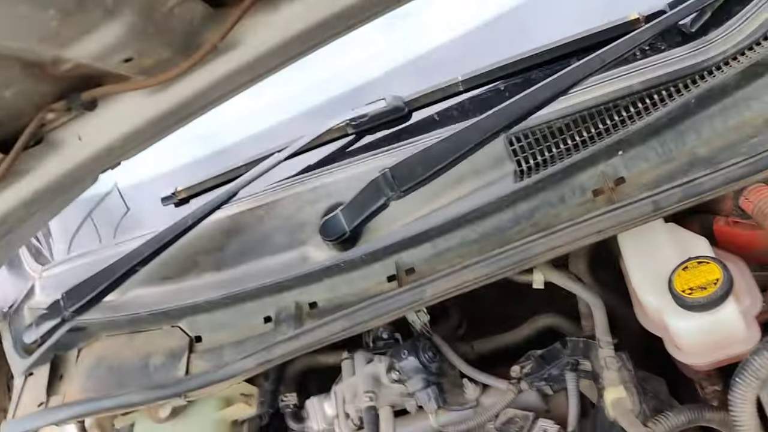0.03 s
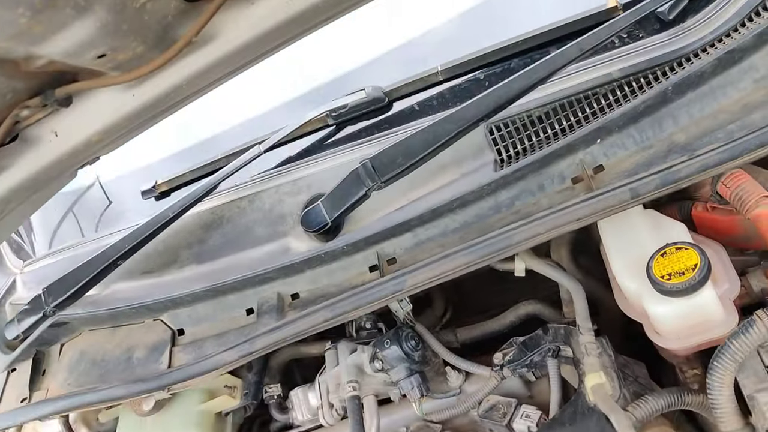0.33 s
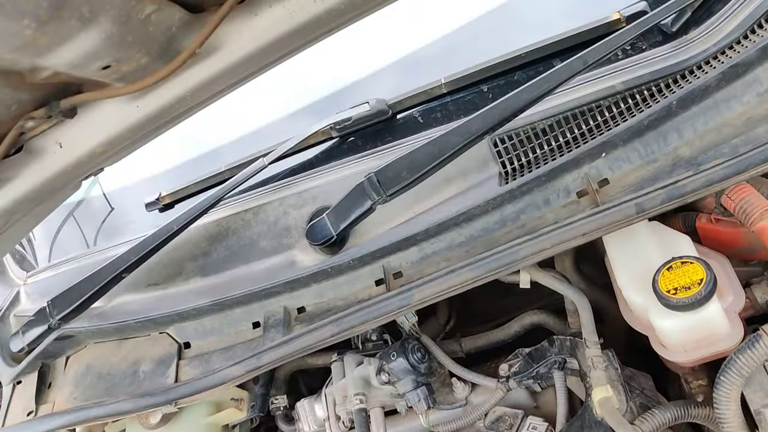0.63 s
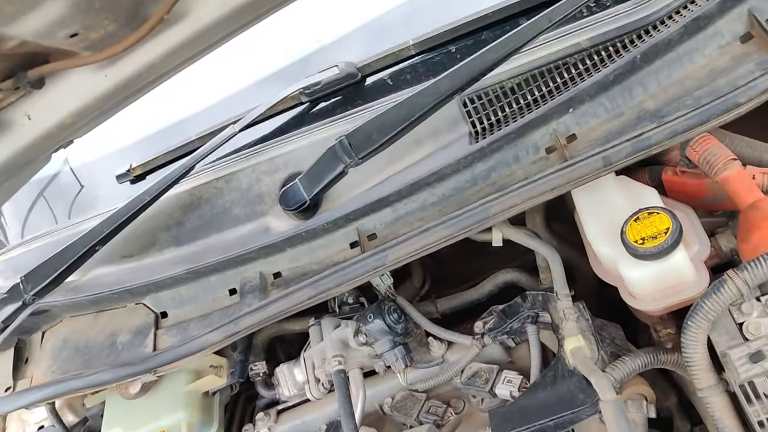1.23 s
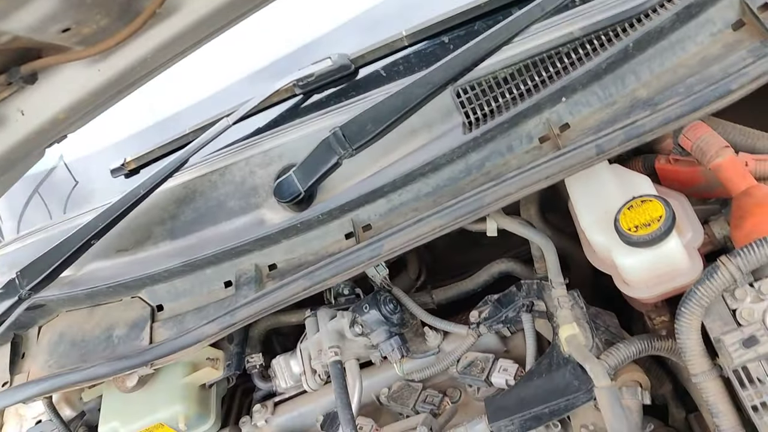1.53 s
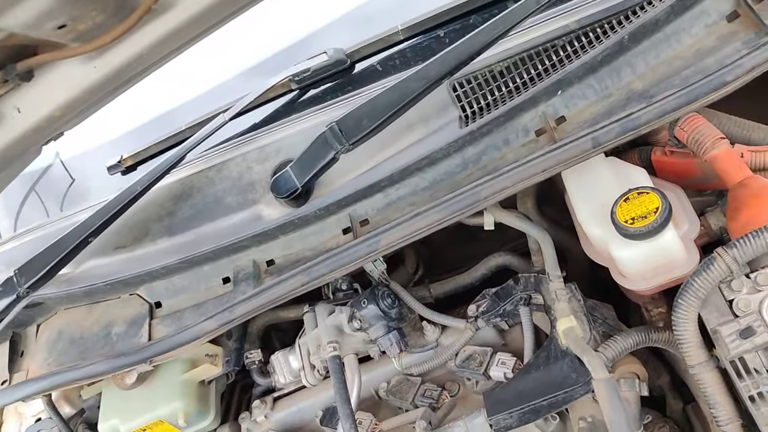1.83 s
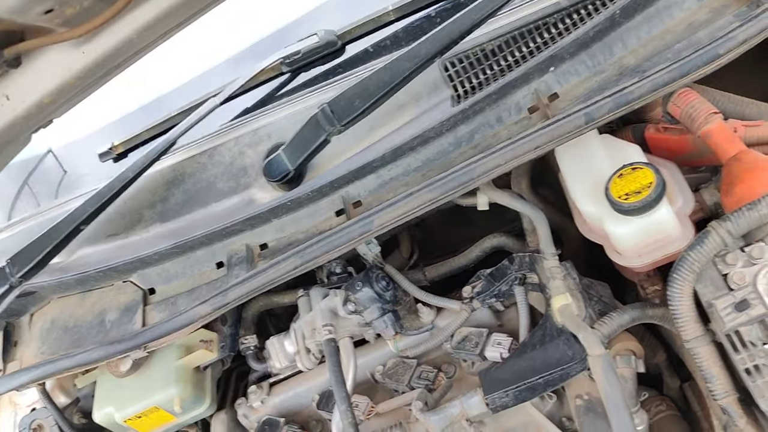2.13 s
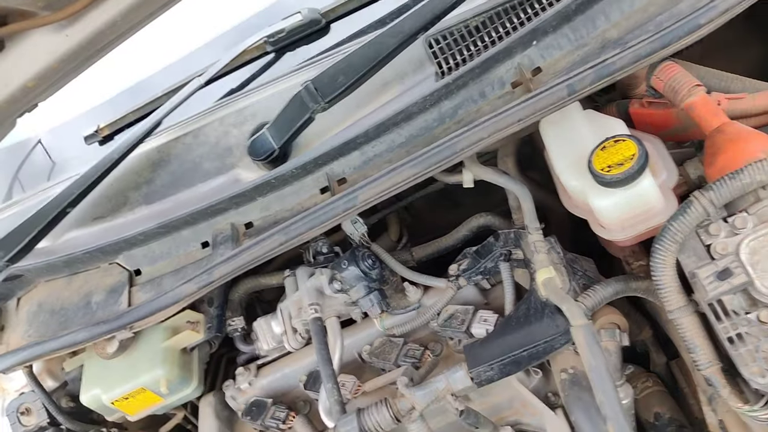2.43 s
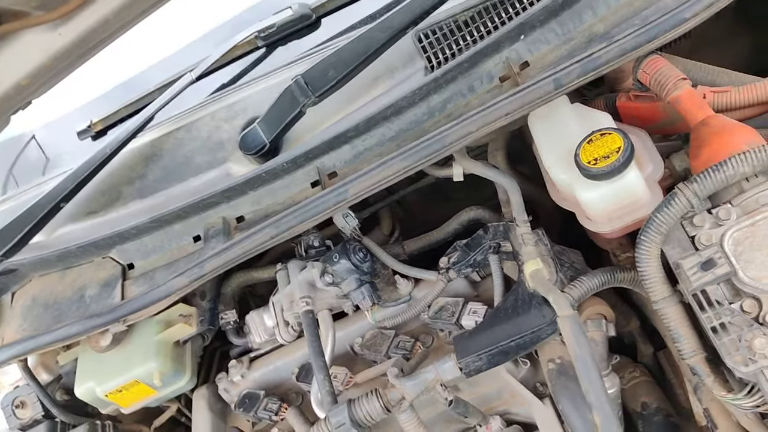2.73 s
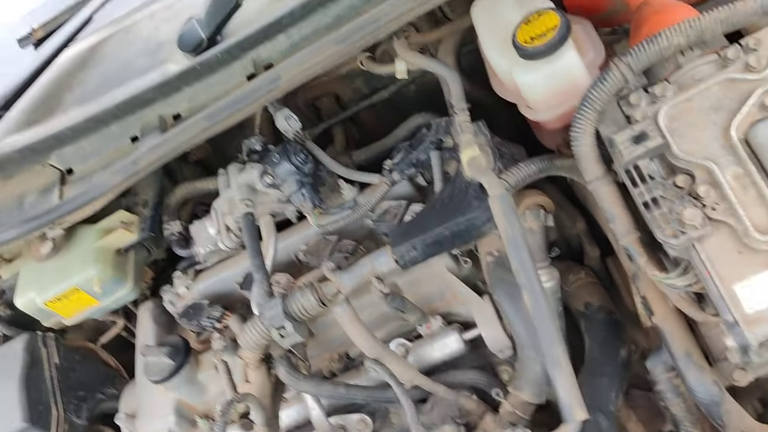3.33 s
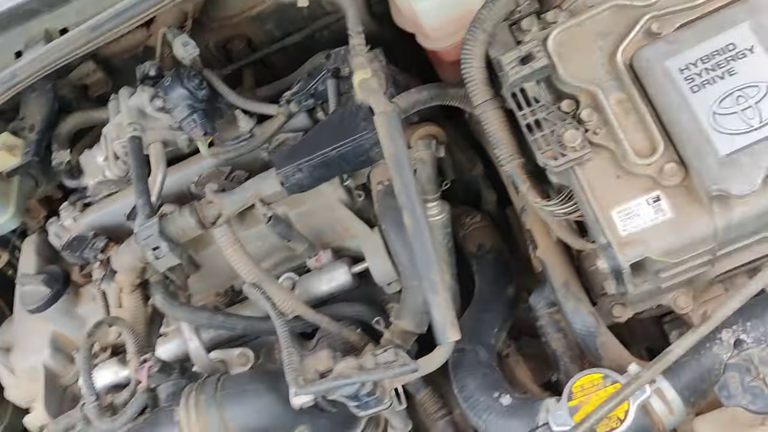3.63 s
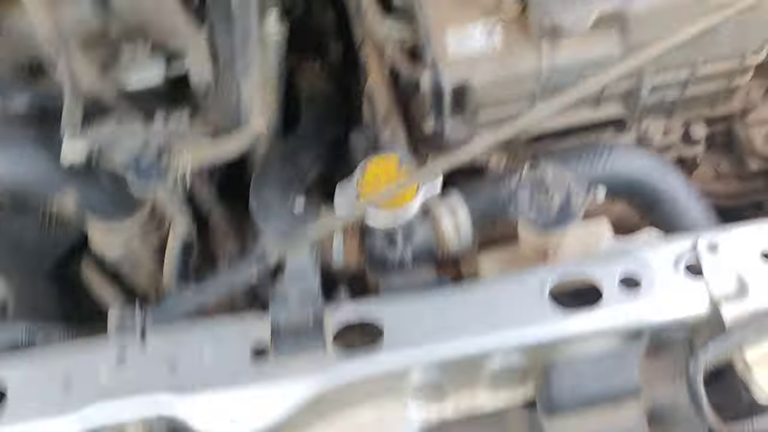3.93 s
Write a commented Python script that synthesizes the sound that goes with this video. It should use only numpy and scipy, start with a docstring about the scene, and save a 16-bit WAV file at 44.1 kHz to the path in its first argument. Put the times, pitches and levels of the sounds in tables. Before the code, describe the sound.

Plastic and metal parts click and knock close by under an open car bonnet. A soft hiss and scuff come first. Sharp clusters with panel thuds fall between 1.2 and 2.1 seconds, another knock at 3, and lighter clicks near 2.3, 2.5 and 3.6, with soft brushes between. Steady outdoor noise and wind rumble lie underneath, while a distant engine's low hum surges in the second half.

```python
"""Outdoors beside a parked car with its bonnet open. Close by, hard plastic and metal parts click
and knock: each touch crunches as the part seats and sets small parts ringing. The harder blows are
followed by a thud that swells in the panels and scatters off the surroundings; soft brushes come
between. Underneath are the low hum of an engine some way off, air on the microphones and a steady
outdoor wash. A soft hiss and a scuff open the scene."""
import sys
import numpy as np
from scipy import signal
from scipy.fft import rfft, irfft
from scipy.io import wavfile
from scipy.ndimage import uniform_filter1d

SR = 44100
rng = np.random.default_rng(int(sys.argv[2]) if len(sys.argv) > 2 else 0)


def wav_out(sig):
    """Save sig, one row per channel (or a flat mono array), as 16-bit PCM at SR to the path in sys.argv[1]."""
    wavfile.write(sys.argv[1], SR, np.round(np.clip(np.atleast_2d(sig).T, -1, 1) * 32767).astype(np.int16))


N = 176400
TIME = np.arange(N) / SR


def from_db(db):
    """Decibels to gain."""
    return 10 ** (np.asarray(db) / 20)


def unit_rms(x):
    """Scale to unit power."""
    return x / np.sqrt(np.mean(x ** 2) + 1e-20)


def unit_peak(stereo, window):
    """Scale so that the loudest stretch of `window` samples has unit power."""
    power = uniform_filter1d(np.mean(stereo ** 2, axis=0), size=window, mode="constant")
    return stereo / np.sqrt(power.max())


def envelope(rows):
    """Gain over time from rows of time_s, level_db."""
    return from_db(np.interp(TIME, *np.transpose(rows)))


def at_hz(rows, hz):
    """Read a table on a log-frequency axis."""
    row_hz, values = np.transpose(rows)
    return np.interp(np.log(np.maximum(hz, 1)), np.log(row_hz), values)


def drift(rate_hz):
    """A slow random wander of about unit size."""
    step, settle = 40, 2000
    pole = np.exp(-2 * np.pi * rate_hz * step / SR)
    white = rng.standard_normal(N // step + settle + 2)
    slow = signal.lfilter([1], [1, -2 * pole, pole * pole], white)[settle:]
    return np.interp(np.arange(N) / step, np.arange(len(slow)), unit_rms(slow))


def spread(pair, likeness, pan_db):
    """Mix two signals as mid and side onto the microphones; positive pan_db leans left."""
    likeness = np.clip(likeness, -.999, .999)
    mid, side = np.sqrt(1 + likeness) * pair[0], np.sqrt(1 - likeness) * pair[1]
    lean = from_db(pan_db)
    return np.array([(mid + side) * lean, mid - side]) / np.sqrt(1 + lean ** 2)


# How noise leans between the microphones: frequency_hz, left_minus_right_db
MIC_BALANCE = [(60, -1), (340, -0.3), (520, -1.5), (790, 2), (1220, 6), (1880, 14.5), (2400, 11.5),
               (2900, 2), (4450, 5), (6800, -3), (10000, 0)]
# How alike the two microphones hear it: frequency_hz, correlation
MIC_LIKENESS = [(60, 0.99), (200, 0.98), (340, 0.86), (520, 0.76), (790, 0.62), (1220, -0.29),
                (1900, 0.015), (3000, 0.071), (9000, -0.016)]


def noise(spectrum):
    """Steady noise of a given colour at the microphone pair, at unit power."""
    hz = np.arange(N // 2 + 1) * SR / N
    white = rfft(rng.standard_normal((2, N)))
    pair = spread(white, at_hz(MIC_LIKENESS, hz), at_hz(MIC_BALANCE, hz))
    return unit_rms(irfft(pair * from_db(at_hz(spectrum, hz)), N))


# The wash of the open air all around: frequency_hz, relative_db
WASH_SPECTRUM = [(40, 10.5), (80, 7), (125, 6.5), (190, 6.5), (300, 2), (520, -2), (800, 0.5), (1150, -1.5),
                 (1600, -3), (2050, 0.5), (2350, -7.5), (2800, -19), (4000, -20.5), (5900, -21),
                 (6450, -27.5), (6950, -53.5), (8000, -43), (11000, -46), (13000, -49.5), (15000, -72)]
# Its nearly even course: time_s, level_db
WASH_LEVEL = [(0, -28.5), (.5, -27.5), (1.5, -27.5), (2.4, -28), (3.15, -29), (3.6, -29.5), (4, -29.5)]


def outdoor_wash():
    """A steady bed of outdoor noise whose level wavers slightly."""
    return envelope(WASH_LEVEL) * noise(WASH_SPECTRUM) * from_db(0.37 * drift(0.92))


# The soft opening hiss: frequency_hz, relative_db
HISS_SPECTRUM = [(100, -29.5), (300, -9), (700, 2.5), (1400, -0.5), (2700, 2), (3400, -12.5), (6000, -12),
                 (6600, -21.5), (7300, -36), (12000, -39.5), (15000, -53.5)]
# Its fade: time_s, level_db
HISS_LEVEL = [(0, -30), (.1, -30.5), (.18, -33.5), (.3, -37.5), (.45, -53), (.9, -71)]


def fading_hiss():
    """A hiss that sinks under the wash within the first half second."""
    return envelope(HISS_LEVEL) * noise(HISS_SPECTRUM)


# Air right on the microphones: frequency_hz, relative_db
AIR_SPECTRUM = [(8, -16), (15, 0), (23, 1), (33, -5), (50, -14), (72, -18), (110, -27.5), (200, -45),
                (1000, -120)]
# Its rise and fall: time_s, level_db
AIR_LEVEL = [(0, -20), (.55, -17), (1.2, -20), (1.6, -18), (2, -19.5), (2.6, -22), (3.3, -21), (4, -23.5)]


def air_on_microphones():
    """Moving air makes a deep rumble on the microphones."""
    return envelope(AIR_LEVEL) * noise(AIR_SPECTRUM)


def wavering_tone(hz, wander_hz, waver_db):
    """A sine that wavers in pitch and strength."""
    phase = 2 * np.pi * (np.cumsum(hz + wander_hz * drift(3.25)) / SR + rng.random())
    return unit_rms(np.sin(phase) * from_db(waver_db * drift(6.8)))


# The main tone of an engine some way off, surging in the second half: time_s, level_db
HUM_LEVEL = [(0, -34), (1.4, -41.5), (1.7, -24), (1.95, -18.5), (2.1, -30), (2.35, -24), (2.75, -16.5),
             (2.92, -24), (3.12, -13.5), (3.45, -28), (3.7, -21), (4, -31)]
# Its steadier second tone: time_s, level_db
DRONE_LEVEL = [(0, -27.5), (.8, -29), (1.5, -24), (2.2, -31.5), (3.3, -27.5), (3.8, -30)]
# Its weak upper tones: pitch_hz, level_db
UPPER_TONES = [(95.5, -43), (174, -44.5)]


def distant_engine(hum_hz=47.7, drone_hz=66.8, left_lag_s=0.00047):
    """The engine's low tones come a little from the right and reach the left microphone later."""
    hum = envelope(HUM_LEVEL) * wavering_tone(hum_hz, wander_hz=0.54, waver_db=1.54)
    drone = envelope(DRONE_LEVEL) * wavering_tone(drone_hz, wander_hz=0.41, waver_db=2.1)
    upper = sum(from_db(db) * wavering_tone(hz, wander_hz=0.63, waver_db=5.5) for hz, db in UPPER_TONES)
    right = hum + drone + upper
    left = np.interp(TIME - left_lag_s, TIME, right)
    return np.array([left, right]) * from_db([[-.3], [.3]])


# Soft brushes of a part, close by: centre_s, width_s, level_db
BRUSH_STROKES = [(.125, .035, -45), (.94, 0.041, -49), (1.146, 0.026, -45.5), (1.766, .018, -43.5),
                 (2.106, .01, -50), (2.244, 0.019, -47.5), (3.096, 0.011, -45), (3.64, 0.065, -53)]
# Their bright colour: frequency_hz, relative_db
BRUSH_SPECTRUM = [(500, -24), (2000, -9), (3200, -1), (5800, 3.5), (6600, -7), (7500, -19), (12000, -21),
                  (15000, -36)]
# One scuff near the start: centre_s, width_s, level_db
SCUFF_STROKES = [(.25, 0.015, -28.5)]
# Its duller colour: frequency_hz, relative_db
SCUFF_SPECTRUM = [(400, -19), (700, 7), (950, 3), (1350, 5), (1900, -16), (3500, -43), (7000, -70)]


def rubs(strokes, spectrum):
    """Rubbing noise that swells and fades in a bell curve with each stroke."""
    swells = sum(from_db(db) * np.exp(-.5 * ((TIME - centre_s) / width_s) ** 2)
                 for centre_s, width_s, db in strokes)
    return noise(spectrum) * swells


def reflections(t, t60_s, rise_s):
    """Dense reflections off the surroundings build up and die; two channels of about unit energy."""
    scatter = rng.standard_normal((2, len(t))) * from_db(-60 * t / t60_s)
    return unit_rms(scatter * (1 - np.exp(-t / rise_s))) / np.sqrt(len(t))


# Low modes of the car's panels: pitch_hz, relative_db, t60_s
PANEL_RESONANCES = [(171, -3, 0.16), (224, 0, 0.17), (270, 1.5, 0.16), (323, -4, 0.14), (387, -0.5, 0.17),
                    (455, 4.5, 0.096), (520, -4, 0.15), (572, -6, 0.13), (645, 2.5, 0.11), (745, -7, .1),
                    (826, 2.5, .1), (936, -8, 0.058)]
# Thuds after the harder blows: start_s, swell_s, centre_hz, level_db
PANEL_THUDS = [(1.264, .028, 447, -26), (1.438, 0.01, 520, -30), (1.653, 0.02, 260, -23),
               (1.782, 0.01, 600, -32.5), (2.051, .013, 378, -19), (2.994, 0.0085, 490, -24)]


def panel_thuds(octave_falloff_db=4.5, tail_db=-7):
    """The large panels answer a blow: their modes swell and die, strongest near that thud's centre."""
    t, out = TIME[:SR // 2], np.zeros((2, N + SR))
    hz, mode_db, t60_s = np.transpose(PANEL_RESONANCES)[:, :, None]
    for start_s, swell_s, centre_hz, level_db in PANEL_THUDS:
        gain = from_db(mode_db - octave_falloff_db * np.log2(hz / centre_hz) ** 2)
        phases = 2 * np.pi * rng.random((2, len(hz), 1))
        decay = from_db(-60 * np.maximum(t - swell_s, 0) / t60_s)
        rings = (gain * np.sin(2 * np.pi * hz * t + phases) * decay).sum(axis=1)
        band = signal.butter(2, [centre_hz / 2, centre_hz * 2], "band", fs=SR, output="sos")
        tail = signal.sosfilt(band, reflections(t, t60_s=0.23, rise_s=0.014))
        body = (unit_rms(rings) + from_db(tail_db) * unit_rms(tail)) * np.minimum(t / swell_s, 1)
        thud = unit_peak(spread(body, likeness=0.9, pan_db=.3), window=SR // 40)
        start = int(start_s * SR)
        out[:, start:start + len(t)] += from_db(level_db) * thud
    return out[:, :N]


def contact_force(t, contact_s, slips_per_s=3400):
    """A first touch, then a short crunch of tiny slips as the part seats."""
    slips = rng.standard_normal(len(t)) * (rng.random(len(t)) < slips_per_s / SR)
    force = slips * np.exp(-(t / contact_s) ** 2)
    force[0] = 1
    return force


# Modes of the small plastic and metal parts: pitch_hz, relative_db, t60_s
PART_RESONANCES = [(1377, -5.5, 0.046), (1530, -2, 0.053), (1745, -1.5, 0.048), (1837, -0.5, 0.033),
                   (2124, 1.5, 0.034), (3260, -14, 0.022), (3900, -7, .022), (5530, -12.5, 0.017),
                   (6030, -1, 0.0086)]


def ringing_parts(t, ping_hz, ping_db, modes_db=-13.5, ping_t60_s=0.015):
    """Small parts ring with new strengths and phases at each blow; the touched one adds its ping."""
    modes = [(hz, modes_db + db, t60_s) for hz, db, t60_s in PART_RESONANCES]
    hz, db, t60_s = np.transpose(modes + [(ping_hz, ping_db, ping_t60_s)])[:, :, None]
    damping = np.log(1000) / t60_s
    rings = np.exp((2j * np.pi * hz - damping) * t) * np.sqrt(4 * damping / SR)  # unit energy each
    strengths = from_db(db[:, 0] + rng.uniform(-2, 2, len(hz)))
    phases = np.exp(2j * np.pi * rng.random(len(hz)))
    ringing = (strengths * phases) @ rings
    return np.array([ringing.real, ringing.imag])


# A knock's three bands (clack, ring, tick) at the microphones:
# low_hz, high_hz, scatter_db, scatter_t60_s, tail_db, tail_t60_s, likeness, left_minus_right_db
KNOCK_BANDS = [(1220, 2260, 1.5, 0.11, -3, 0.22, 0, 7), (3110, 6350, -1.5, 0.065, -12, 0.13, 0, 1.7),
               (6500, 13400, -3, 0.031, -12, .09, 0.2, -2.5)]


def knock(t, contact_s, ping_hz, ping_db, levels_db):
    """One contact drives a direct crack, ringing parts, close scatter and an outdoor tail."""
    force = contact_force(t, contact_s)
    rings = ringing_parts(t, ping_hz, ping_db)
    crack, out = np.zeros((2, len(t))), 0
    crack[0, 0] = crack[1, 18] = 1  # the side signal follows the mid by 0.4 ms
    for band, level_db in zip(KNOCK_BANDS, levels_db):
        low_hz, high_hz, scatter_db, scatter_t60_s, tail_db, tail_t60_s, likeness, pan_db = band
        scatter = from_db(scatter_db) * reflections(t, scatter_t60_s, rise_s=3.5 / low_hz)
        tail = from_db(tail_db) * reflections(t, tail_t60_s, rise_s=0.016)
        response = spread(crack + rings + scatter + tail, likeness, pan_db)
        struck = signal.fftconvolve(response, force[None], axes=1)[:, :len(t)]
        highpass = signal.butter(4, low_hz, "high", fs=SR, output="sos")
        lowpass = signal.butter(int(np.clip(high_hz / 400, 3, 16)), high_hz, fs=SR, output="sos")
        in_band = signal.sosfilt(lowpass, signal.sosfilt(highpass, struck))
        out = out + from_db(level_db) * unit_peak(in_band, window=int(SR * (.002 + 1.5 / low_hz)))
    return out


# Contacts under the open bonnet, close to the microphones:
# start_s, contact_s, ping_hz, ping_relative_db, clack_db, ring_db, tick_db
CONTACTS = [(1.2106, 0.0013, 4830, -16, -23, -27, -41), (1.213, .005, 4800, -7, -33, -26, -50),
            (1.2363, 0.018, 5960, -15, -31, -35.5, -61), (1.264, 0.00054, 5850, -6, -19, -15, -53),
            (1.413, .0025, 5760, -10, -34, -31, -55), (1.4160, 0.0033, 4700, -13, -21.5, -27, -53),
            (1.4425, 0.0057, 5900, -6, -34, -36, -64), (1.6517, 0.0027, 5770, -8, -19, -15, -41),
            (1.656, 0.0054, 5850, 1, -20, -16.5, -42), (1.674, 0.021, 5800, -14, -21.5, -29.5, -57),
            (1.744, 0.00092, 5150, -10, -28.5, -42, -68), (1.7778, .003, 5100, -10, -29, -34, -52),
            (1.7811, 0.0042, 3900, -6.5, -29.5, -25.5, -46.5), (2.047, 0.00068, 6260, -20, -17, -14, -38),
            (2.0493, 0.0021, 3880, -8, -20, -22, -56), (2.054, 0.0059, 4400, 1, -22, -19.5, -54),
            (2.2765, 0.0044, 6040, -5, -31, -33.5, -70), (2.5255, 0.006, 5900, -17, -37, -37, -65),
            (2.9835, 0.0062, 5570, -18, -27.5, -32, -57), (2.9977, 0.004, 4270, -9, -24, -22.5, -51),
            (3.5887, 0.0031, 5830, -13, -27.5, -40, -60), (3.5966, .007, 6300, -6, -40, -36.5, -61)]


def bonnet_knocks():
    """Hard parts click and knock against each other, singly and in quick clusters."""
    t, out = TIME[:SR * 2 // 5], np.zeros((2, N + SR))
    for start_s, contact_s, ping_hz, ping_db, *levels_db in CONTACTS:
        start = int(start_s * SR)
        out[:, start:start + len(t)] += knock(t, contact_s, ping_hz, ping_db, levels_db)
    return out[:, :N]


def scene():
    """Knocks, thuds and rubs at the car, over the distant engine and the open air."""
    car = bonnet_knocks() + panel_thuds()
    rubbing = rubs(BRUSH_STROKES, BRUSH_SPECTRUM) + rubs(SCUFF_STROKES, SCUFF_SPECTRUM)
    return car + rubbing + distant_engine() + outdoor_wash() + fading_hiss() + air_on_microphones()


def record(dry):
    """The microphone signal clips at full scale, and its highest treble is cut steeply."""
    stopband_hz = 16218
    lowpass = signal.cheby2(18, 70, stopband_hz, fs=SR, output="sos")
    return signal.sosfilt(lowpass, np.clip(dry, -1, 1))


dry = scene()
out = record(dry)
wav_out(out)
```